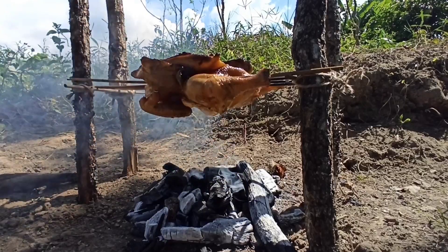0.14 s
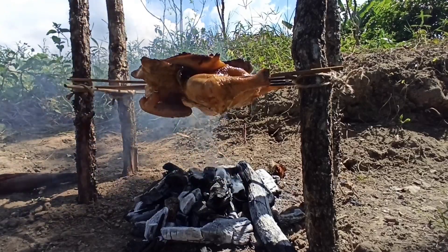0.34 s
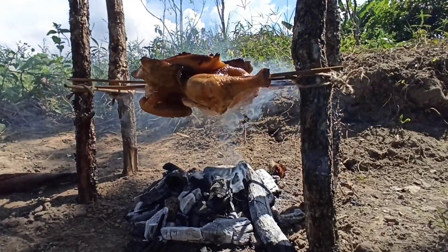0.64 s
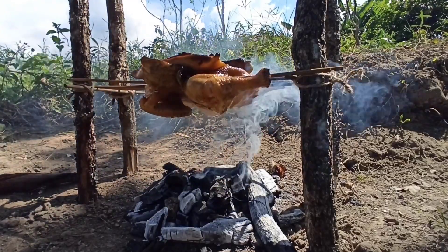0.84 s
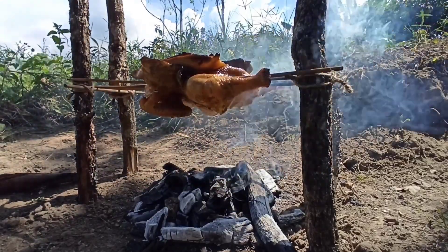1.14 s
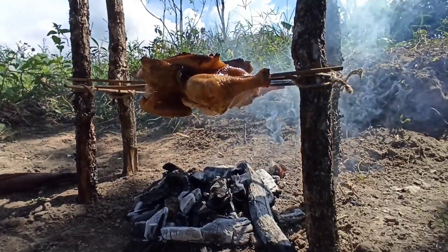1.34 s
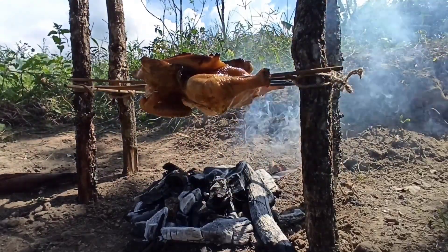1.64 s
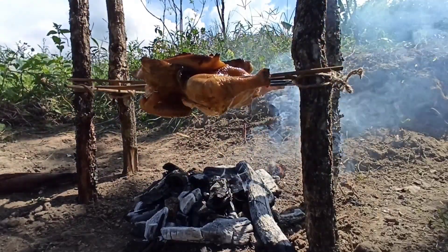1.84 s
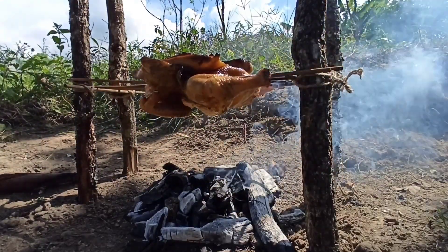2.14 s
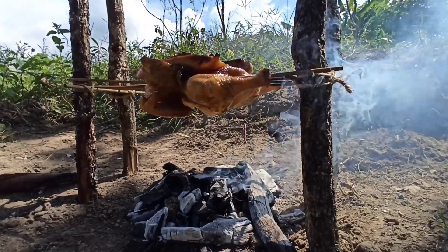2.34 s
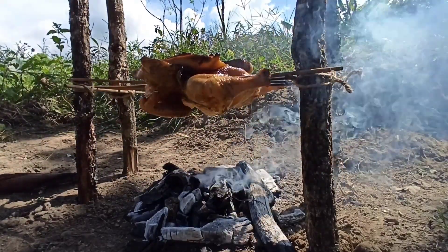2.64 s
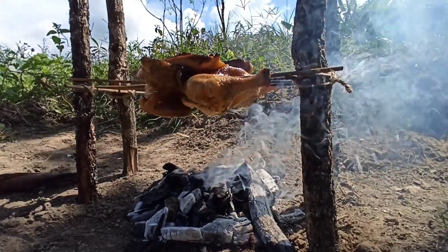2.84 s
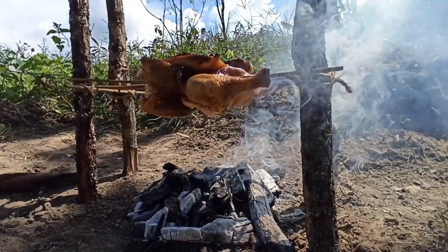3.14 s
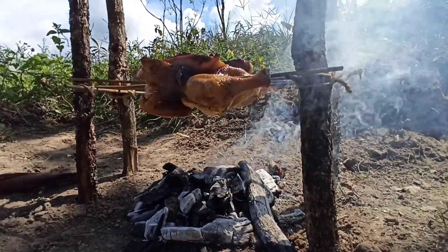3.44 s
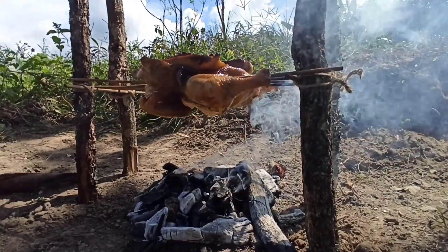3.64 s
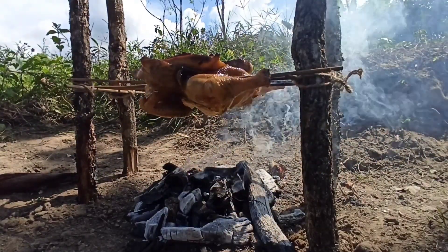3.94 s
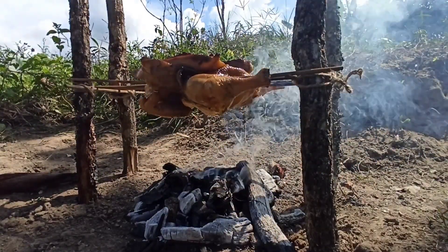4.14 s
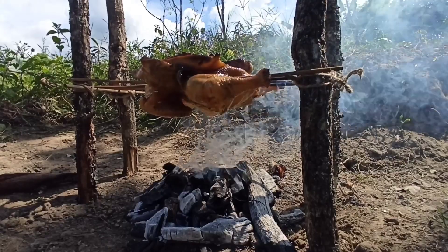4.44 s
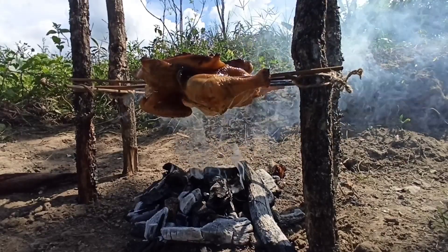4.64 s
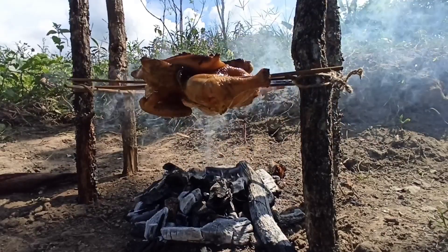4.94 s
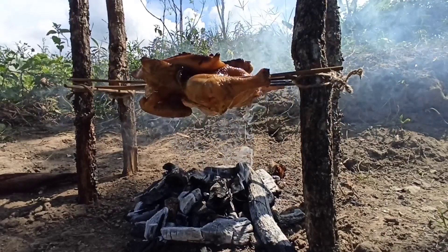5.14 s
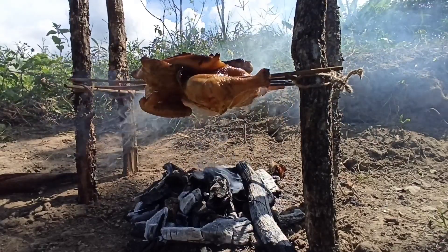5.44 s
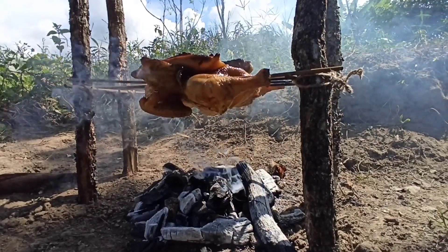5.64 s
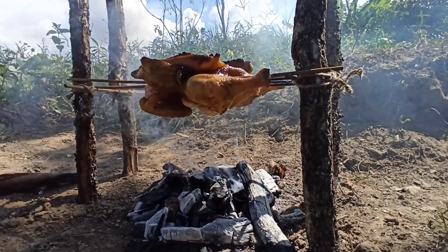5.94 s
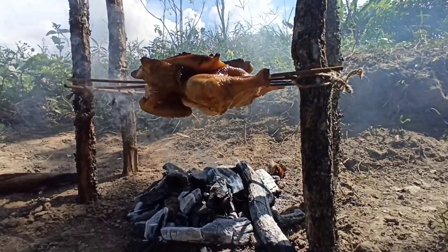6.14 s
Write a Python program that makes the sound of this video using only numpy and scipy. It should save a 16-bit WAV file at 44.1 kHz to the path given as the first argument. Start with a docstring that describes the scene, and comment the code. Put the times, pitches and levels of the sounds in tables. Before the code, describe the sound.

Close to a charcoal fire outdoors, glassy ticks of cracking coal open over a faint low rumble and thin hiss. After two seconds, dripping fat erupts in bright, fluttering sizzles with dense crackle and sharp pops. It quickly thins to scattered spits, then a brief grainy double rasp and a few soft thuds with dull rustles.

```python
"""Outdoors at a charcoal fire, fat drips from a roast onto glowing coals, close to a small microphone.
Drips flash into hissing steam (shaped, fluttering noise) and boil away in bubbles (random clicks).
Larger bubbles pop as single sharp clicks, and cracking charcoal tinks with short dying tones.
Around them are a two-stroke rasp of grainy noise, soft low thuds, dull rustles and faint chirps,
over a low rumble, a wavering hum and a thin steady hiss."""
import sys
import numpy as np
from scipy import signal
from scipy.fft import rfft, irfft, next_fast_len
from scipy.io import wavfile
from scipy.ndimage import map_coordinates

SR = 44100
rng = np.random.default_rng(int(sys.argv[2]) if len(sys.argv) > 2 else 0)


def to_wav(sig):
    """Store sig (one row per channel, or 1-D mono) as 16-bit WAV at the path in sys.argv[1].

    Samples outside -1..1 are clipped; the rate is SR.
    """
    pcm = np.clip(np.atleast_2d(sig), -1, 1) * 32767
    pcm = np.round(pcm).astype(np.int16)
    wavfile.write(sys.argv[1], SR, pcm.T)  # frames by channels


N = 277808  # length in samples

# All levels below are those before the microphone colours the sound.
# drips of fat that flash at once or seep in slowly, then boil away; levels before STEAM_LIFT_DB:
# (time [s], steam level [dB], extra low body [dB], extra top spray [dB], crackle level [dB],
#  bubbles [per s], rise [s], hold [s], fade [dB per s]); the lift is for the steam alone
DRIPS = [(0.696, -53, 4.5, 5.5, -57, 440, 0.0071, .01, 150),
         (0.732, -60.5, 10.5, 0, -62, 1600, 0.033, 0.028, 13),
         (1.273, -58, 5, -2.5, -61.5, 950, 0.051, 0.024, 11.5),
         (2.138, -36, -3, -4, -43.5, 2700, 0.0056, 0.027, 78),
         (2.246, -34, -6, -5, -40, 890, 0.012, 0.0091, 220),
         (2.297, -33.5, -5.5, 0.5, -39, 1100, 0.066, 0.052, 230),
         (2.425, -41, -7, -2, -37.5, 1400, 0.027, 0.18, 89),
         (2.528, -38.5, -4, 3, -58, 290, 0.015, 0.027, 300),
         (2.632, -40, 1.5, 3.5, -36.5, 1290, 0.078, 0.14, 91.5),
         (2.892, -48.5, -5, 0, -45, 430, 0.075, .05, 22.5), (3.3, -70, -4, 2, -56.5, 85, 0.12, 0.99, 3.5),
         (3.62, -55, -3, -4, -61, 147, 0.031, 0.068, 220),
         (4.152, -48.5, -8, 3.5, -52.5, 300, 0.0058, 0.034, 100),
         (4.504, -59, -9.5, 5.5, -61.5, 170, 0.17, .2, 12)]
STEAM_LIFT_DB = 0.5
# the simmer that never stops; its steam also gets the lift
SIMMER_STEAM_DB, SIMMER_CRACKLE_DB, SIMMER_BUBBLES_PER_S = -68.5, -75, 250
# balance of pitches in the steam: (frequency [Hz], relative level [dB])
STEAM_SPECTRUM = [(100, -36), (350, -13), (550, -14.5), (800, -17), (1300, -13.5), (2000, -15), (3000, -13),
                  (4200, -8), (6000, -2), (7400, -3), (9000, -8.5), (12000, -10.5), (15500, -3.5)]
# balance of pitches in a bursting bubble: (frequency [Hz], relative level [dB])
BUBBLE_SPECTRUM = [(100, -30), (300, -10.5), (800, -7), (2000, -13), (3000, -9.5), (4200, -3), (6000, -1),
                   (7400, 0), (9000, -3), (12000, -6.5), (15500, -4.5)]
# the loudest pops of fat, before POP_LIFT_DB:
# (time [s], level [dB], low body tint [dB], top sparkle tint [dB])
LOUD_POPS = [(2.2044, -5.5, -4, -11), (2.4185, -14, 7.5, 1), (2.4523, -15.5, 10, -17),
             (2.5078, -11, 1, -16), (2.5502, 2.2, -2.5, 1.5), (2.6035, -2, 3, -0.5), (2.6083, -14, 6, 2),
             (2.6186, -12.5, 8, -13), (2.6667, -9, -2, -4), (2.7113, -16, -8, 9), (2.7559, -3, -1.5, 2.5),
             (2.7732, -7.5, -4, -6), (2.7775, -5.7, -1.5, -5), (2.7967, -18, -9, 15),
             (2.9103, -11.5, -1.5, 8.5), (3.0036, -11, 3, -5), (3.0237, -11, -4, -8), (3.0503, -19, 8.5, 3),
             (3.1055, -6.5, 5, -4), (3.16, -17, -6, -3), (3.1939, -19.5, 5, 3), (3.2261, -9, -2, -3),
             (3.2422, -24, -6, -0.4), (3.2724, -13.5, -4, -5), (3.3009, -10, -1, 1), (3.339, -16.5, 4, -6),
             (3.364, -24.5, 3, 5), (3.4293, -28, 10, 3), (3.4839, -20.5, -5, -2), (3.7001, -21.5, -9, 5.4),
             (3.7394, -16.5, -9, 1), (3.7436, -23, 6.5, 10.5), (3.8431, -22.5, 0.5, 0),
             (3.9342, -26, 6, -4), (3.9672, -18.5, -5, 0), (4.0065, -20.5, 0, 0), (4.073, -15, 1, -3),
             (4.2594, -15.5, -2.5, 4.5), (4.3072, -21, 1.5, 3.5), (4.6727, -10, -6.5, 1.5),
             (4.7956, -20, 1, -2), (4.846, -19.5, -6, 4), (4.9859, -13, -4, 0), (5.268, -25.5, 1, 5),
             (5.421, -21.5, -2, 8.5), (5.4679, -27.5, -4, -1), (5.734, -24, 2, 3), (5.7932, -27, -17, 5),
             (6.0352, -27.5, -7, 8), (6.0755, -25.5, 0.5, 5), (6.1159, -13, 12, -2.5)]
POP_LIFT_DB = 7.5  # raises every pop, loud or lesser
# lesser pops: share of all bubbles, level over the crackle before the lift, scatter of size and colour
SPIT_SHARE, SPIT_DB, SPIT_SCATTER_DB = 0.03, 19, 2.5
# glassy tinks of charcoal cracking in the heat: (time [s], level [dB], brightness [dB per octave])
TINKS = [(.1143, -34, 2), (.1530, -28, 1), (.156, -37.5, -2), (.189, -50, 2), (1.001, -55.5, 23.5),
         (1.8546, -44, 15)]
# notes a piece of charcoal rings with: (frequency [Hz], relative level [dB], time to fall 60 dB [s])
CHARCOAL_NOTES = [(2950, -24, 0.0099), (3940, -7.5, 0.0058), (6600, -8, 0.011), (7520, -4.5, 0.013),
                  (8340, 3, 0.0053), (13100, -9, 0.0076), (14500, -7, 0.011), (14600, -7, .008)]
# the two strokes of a short rasp: (time [s], level [dB], hold [s])
RASP_STROKES = [(5.21, -41, .028), (5.258, -52, 0.04)]
RASP_RISE_S, RASP_FADE_DB_PER_S = 0.0052, 1150
# faint echo of the rasp from the surroundings; level is relative to its stroke
RASP_ECHO_DB, RASP_ECHO_FADE_DB_PER_S = -22, 39
# what the rasp resonates with: (frequency [Hz], width [Hz], relative level [dB])
RASP_RESONANCES = [(850, 210, -5), (1540, 220, 0), (1845, 190, 3), (2450, 320, -4), (3070, 410, -13),
                   (3740, 400, -9), (4500, 290, -8.5), (6900, 1900, -14)]
# soft dull thuds: (time [s], level [dB], pitch [Hz], time to fall 60 dB [s])
THUDS = [(0.846, -41.5, 168, 0.073), (1.526, -48, 102, 0.17), (1.735, -51, 83, 0.13),
         (3.745, -36, 247, 0.036), (6.069, -27, 244.7, 0.043), (6.09, -32.5, 255, 0.042),
         (6.129, -43, 201, .05), (6.234, -43, 263, 0.088)]
# faint thin chirps: (time [s], peak level [dB], start pitch [Hz], end pitch [Hz], length [s])
CHIRPS = [(0.845, -52.5, 3850, 3950, 0.018), (.995, -55, 6300, 6330, 0.015),
          (5.175, -64.5, 3380, 2990, .028), (5.959, -52.5, 6230, 6400, .045), (6.088, -57, 4050, 3950, .02)]
# dull rustles beside the late thuds: (time [s], level [dB])
RUSTLES = [(6.052, -57), (6.231, -53.5)]
RUSTLE_RISE_S, RUSTLE_FADE_DB_PER_S = 0.025, 180
# muffled balance of pitches in the rustles: (frequency [Hz], relative level [dB])
RUSTLE_SPECTRUM = [(60, -23), (180, 0), (330, -1), (500, -13), (700, -7), (1000, -33), (3000, -47)]
# the faint hum's level, around which it wavers: (time [s], level [dB])
HUM_LEVEL = [(0, -61.5), (2.35, -62), (3.5, -70.5), (5.85, -87), (6.2, -59)]
# balance of pitches in the low outdoor rumble: (frequency [Hz], relative level [dB])
RUMBLE_SPECTRUM = [(20, -25), (35, -32), (60, -10), (90, -1), (170, -1.5), (250, -5), (380, -10.5),
                   (700, -16), (1200, -23), (2500, -23.5), (6000, -36.5)]
# balance of pitches in the thin background hiss: (frequency [Hz], relative level [dB])
AIR_SPECTRUM = [(500, -33), (1500, -7), (2500, -23), (3200, -3.5), (4000, -2), (4550, 0), (4720, 7.5),
                (4950, 4), (5200, 0.5), (6500, -4.5), (7500, -7), (9000, -6.5), (15500, -12)]
# the microphone's colour, with a shallow and a deep notch: (frequency [Hz], gain [dB])
MIC_COLOUR = [(4750, -0.5), (4950, -10.5), (5950, -6.5), (6150, 1), (7650, 4), (7750, 1.5), (8480, -0.5),
              (8620, -14.5), (10300, -20), (11500, -22), (11620, -1)]
MIC_TOP_HZ = 15520


def boiling(thinning):
    """Drips and simmer add in power: steam gains, crackle gain and bubbles a second, fewer as drips dry."""
    steam_power = amp(SIMMER_STEAM_DB) ** 2
    crackle_power = amp(SIMMER_CRACKLE_DB) ** 2
    per_second = SIMMER_BUBBLES_PER_S
    for s, steam_db, body_db, spray_db, crackle_db, rate, rise, hold, fade in DRIPS:
        boil = envelope(s, rise, hold, fade)
        bands = amp([[body_db], [0], [spray_db]])  # low body, middle hiss, top spray
        steam_power = steam_power + (amp(steam_db) * bands * boil) ** 2
        crackle_power = crackle_power + (amp(crackle_db) * boil) ** 2
        per_second = per_second + rate * boil ** thinning
    return np.sqrt(steam_power), np.sqrt(crackle_power), per_second


def steam(levels, flutter_db, body_hz, spray_hz):
    """Vapour jets from under the fat as fluttering noise; each drip sets its body, hiss and spray."""
    body, hiss, spray = levels
    jet = noise(STEAM_SPECTRUM)
    low = filtered(jet, lambda hz: 1 / (1 + (hz / body_hz) ** 6))
    top = filtered(jet, lambda hz: 1 - 1 / (1 + (hz / spray_hz) ** 10))
    middle = jet - low - top
    flutter = amp(flutter_db * wobble(220))
    return flutter * (body * low + hiss * middle + spray * top)


def bubbles(level, per_second, spread_db, tint_db, count=8):
    """Bubbles burst at several spots, each with its own colour; harder boiling makes more of them."""
    out = np.zeros(N)
    for _ in range(count):
        bursts = rng.random(N) < per_second / count / SR
        # random sizes, with the very biggest held back
        sizes = unit(amp(spread_db * np.minimum(rng.standard_normal(N), 1.7)))
        colour = [(hz, db + tint_db * rng.standard_normal()) for hz, db in BUBBLE_SPECTRUM]
        click = scattered(snap(lambda hz: gains(colour, hz)), echo_db=-1.5, t60=0.01)
        click = click / np.linalg.norm(click)
        out += signal.oaconvolve(bursts * sizes, click)[:N]
    # more bubbles would be louder, so divide that out and let level decide
    return out * level * np.sqrt(SR / per_second)


def spits(crackle, per_second, body_db, top_db):
    """A small random share of the bubbles grows big enough to pop: rows like those of LOUD_POPS."""
    at = np.flatnonzero(rng.random(N) < SPIT_SHARE * per_second / SR)
    scatter = SPIT_SCATTER_DB * rng.standard_normal((len(at), 3))
    rows = []
    for i, (size, body, top) in zip(at, scatter):
        level_db = 20 * np.log10(crackle[i]) + SPIT_DB + size
        rows.append((i / SR, level_db, body_db + body, top_db + top))
    return rows


def pops(rows, level_db):
    """Larger bursts: one sharp pressure step each, some fuller and some brighter."""
    out = np.zeros(N)
    for s, db, body_db, top_db in rows:
        tint = [(300, body_db - 5.5), (1500, body_db - 7.5), (4200, 0.82 * body_db),
                (7000, 0.0041), (12500, top_db - 1.0)]
        click = snap(lambda hz: gains(BUBBLE_SPECTRUM, hz) * gains(tint, hz))
        add(out, s, amp(db + level_db) * scattered(click, echo_db=-10, t60=0.021))
    return out


def tinks(attack, detune, crack_db):
    """Each crack clicks and rings a slightly different piece of charcoal for a few milliseconds."""
    out, t = np.zeros(N), np.arange(SR // 30) / SR
    note_hz, level_db, t60 = np.transpose(CHARCOAL_NOTES)[:, :, None]
    for s, db, bright_db in TINKS:
        pitch = note_hz * (1 + detune * rng.standard_normal(note_hz.shape))
        tilt_db = bright_db * np.log2(note_hz / 7400)  # lifts the notes above 7400 Hz
        ring = amp(level_db + tilt_db - 60 * t / t60) * np.sin(2 * np.pi * pitch * t)
        add(out, s, amp(db) * (1 - np.exp(-t / attack)) * ring.sum(axis=0))
        add(out, s, amp(db + crack_db) * snap(lambda hz: gains(BUBBLE_SPECTRUM, hz)))
    return out


def rasp(rough_db):
    """Two grainy spurts of noise in a few broad resonances, with a faint echo."""
    def body(f):
        total = 0
        for k, (centre, width, db) in enumerate(RASP_RESONANCES):
            resonance = 1j * f * width / (centre * centre - f * f + 1j * f * width)
            total = total + (-1) ** k * amp(db) * resonance  # neighbours have opposite signs
        return total

    grit = rng.standard_normal(N) * amp(rough_db * wobble(600))
    level = 0
    for s, db, hold in RASP_STROKES:
        stroke = envelope(s, RASP_RISE_S, hold, RASP_FADE_DB_PER_S)
        echo = amp(RASP_ECHO_DB) * envelope(s, hold, 0, RASP_ECHO_FADE_DB_PER_S)
        level = level + amp(db) * np.maximum(stroke, echo)
    return level * unit(filtered(grit, body))


def thuds(attack):
    """Soft knocks, each a few dying cycles of one low note."""
    out, t = np.zeros(N), np.arange(SR // 5) / SR
    for s, db, hz, t60 in THUDS:
        fade = amp(db - 60 * t / t60)
        onset = 1 - np.exp(-t / attack)
        add(out, s, -fade * onset * np.sin(2 * np.pi * hz * t))
    return out


def chirps(waver_hz):
    """Brief unsteady whistles that swell and fade."""
    out = np.zeros(N)
    for s, db, start_hz, end_hz, length in CHIRPS:
        n = int(length * SR)
        pitch = np.linspace(start_hz, end_hz, n) + waver_hz * wobble(460)[:n]
        whistle = np.sin(2 * np.pi * np.cumsum(pitch) / SR)
        add(out, s, amp(db) * np.hanning(n) * whistle)
    return out


def rustles():
    """Dull puffs of muffled noise that rise quickly and die away."""
    level = sum(amp(db) * envelope(s, RUSTLE_RISE_S, 0, RUSTLE_FADE_DB_PER_S) for s, db in RUSTLES)
    return level * noise(RUSTLE_SPECTRUM)


def hum(centre_hz):
    """A faint low tone whose pitch and level both waver."""
    pitch = centre_hz + 2.196 * wobble(9)
    level = amp(curves(HUM_LEVEL)[0] + 2.4 * wobble(4.52))
    return level * np.sin(2 * np.pi * np.cumsum(pitch) / SR)


def outdoors(rumble_db, air_db):
    """Two shaped noises: a low rumble that swells slightly and a thin steady hiss."""
    rumble = amp(rumble_db + 0.72 * wobble(12)) * noise(RUMBLE_SPECTRUM)
    return rumble + amp(air_db) * noise(AIR_SPECTRUM)


def scattered(click, echo_db, t60):
    """A click followed by its dense echoes from the heap of coals and the ground."""
    t = np.arange(SR // 20) / SR
    paths = rng.standard_normal(len(t)) * amp(-60 * t / t60)
    paths *= amp(echo_db) / np.linalg.norm(paths)
    paths[0] += 1  # the direct sound
    return signal.fftconvolve(click, paths)


def snap(response, size=1024):
    """The shortest click with the given spectrum, its energy packed at the start (minimum phase)."""
    cepstrum = irfft(np.log(response(np.fft.rfftfreq(size, 1 / SR)) + 1e-6))
    cepstrum[1:size // 2] *= 2
    cepstrum[size // 2 + 1:] = 0
    return irfft(np.exp(rfft(cepstrum)))


def envelope(s, rise, hold, fade):
    """From time s: a straight rise, a hold, then a fade in dB a second."""
    t = np.arange(N) / SR - s
    rising = np.clip(t / max(rise, 1 / SR), 0, 1)
    return rising * amp(-abs(fade) * np.maximum(t - rise - hold, 0))


def noise(spectrum):
    """Random noise with the given balance of pitches, at average strength (rms) 1."""
    return unit(filtered(rng.standard_normal(N), lambda hz: gains(spectrum, hz)))


def filtered(x, response):
    """Multiply each frequency in x by a response."""
    m = next_fast_len(N + SR // 2)  # spare room so that the end does not wrap to the start
    return irfft(rfft(x, m) * response(np.fft.rfftfreq(m, 1 / SR)), m)[:N]


def wobble(rate):
    """A smooth random curve through a given number of random points a second."""
    return map_coordinates(rng.standard_normal(int(N * rate / SR) + 4), [np.arange(N) * rate / SR])


def curves(rows):
    """Join the rows by straight lines: one value per sample for each column after the time."""
    s, *cols = np.transpose(rows)
    return [np.interp(np.arange(N) / SR, s, c) for c in cols]


def gains(points, hz):
    """Gain read from (frequency [Hz], level [dB]) points joined on a log frequency axis."""
    f, db = np.transpose(points)
    return amp(np.interp(np.log(hz + 1), np.log(f + 1), db))


def amp(db):
    """Turn decibels into a multiplying gain."""
    return 10 ** (np.asarray(db) / 20)


def unit(x):
    """Scale to average strength (rms) 1."""
    return x / np.sqrt(np.mean(x ** 2) + 1e-20)


def add(track, s, sound):
    """Mix a sound into the track at time s."""
    part = track[max(round(s * SR), 0):][:len(sound)]
    part += sound[:len(part)]


def scene():
    """The boiling fat, the coals and everything around the fire, in one channel."""
    vapour, crackle, per_second = boiling(thinning=0.72)
    hiss = amp(STEAM_LIFT_DB) * steam(vapour, flutter_db=2.55, body_hz=4420, spray_hz=8550)
    fizz = bubbles(crackle, per_second, spread_db=12.5, tint_db=1.5)
    lesser_pops = spits(crackle, per_second, body_db=-2.5, top_db=-2.5)
    popping = pops(list(LOUD_POPS) + lesser_pops, level_db=POP_LIFT_DB)
    coals = tinks(attack=0.00015, detune=0.016, crack_db=1)
    nearby = rasp(rough_db=1.5) + thuds(attack=0.0029) + chirps(waver_hz=220) + rustles()
    background = hum(centre_hz=176.1) + outdoors(rumble_db=-59.0, air_db=-63.0)
    return (hiss + fizz + popping + coals + nearby + background)[None]


def record(dry):
    """The microphone colours the sound and keeps nothing above its band limit."""
    return filtered(dry[0], lambda hz: gains(MIC_COLOUR, hz) * (hz < MIC_TOP_HZ))[None]


dry = scene()
out = record(dry)
to_wav(out)
```